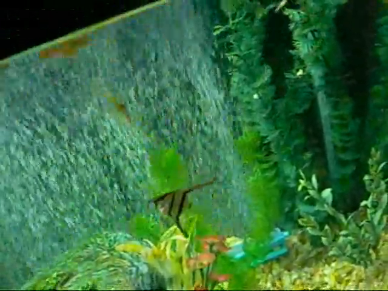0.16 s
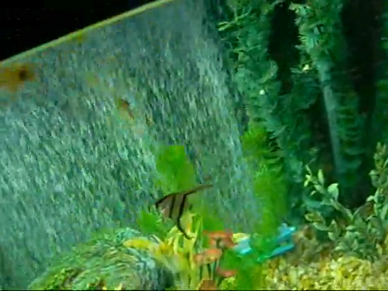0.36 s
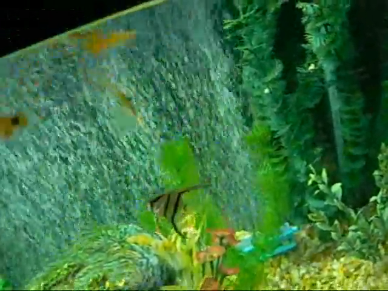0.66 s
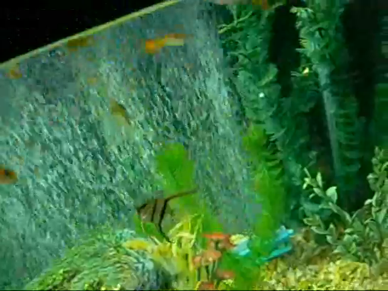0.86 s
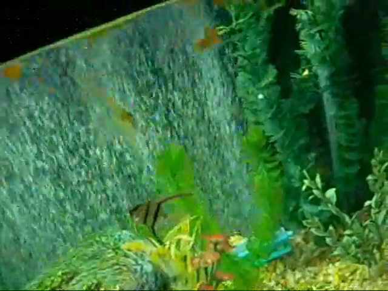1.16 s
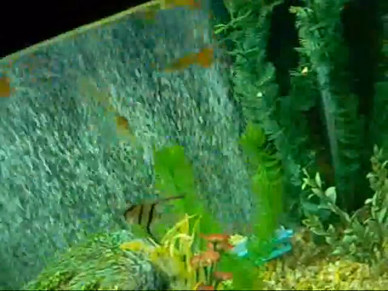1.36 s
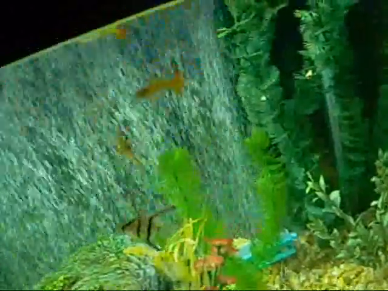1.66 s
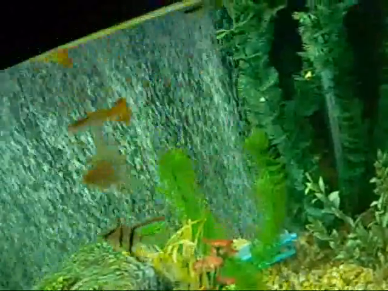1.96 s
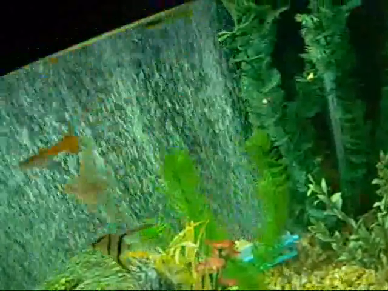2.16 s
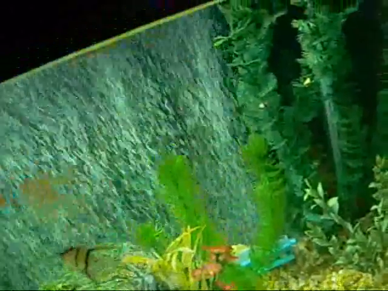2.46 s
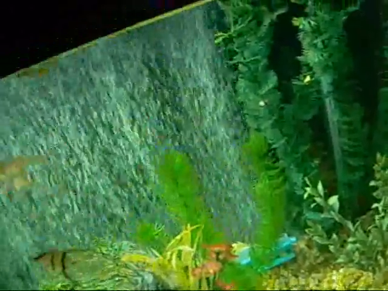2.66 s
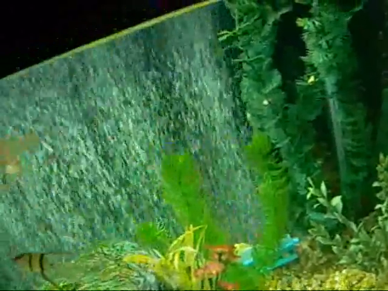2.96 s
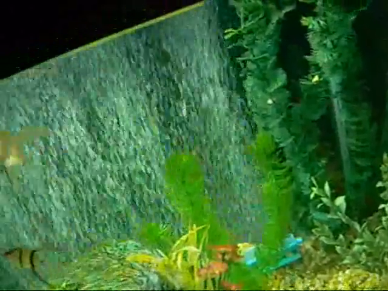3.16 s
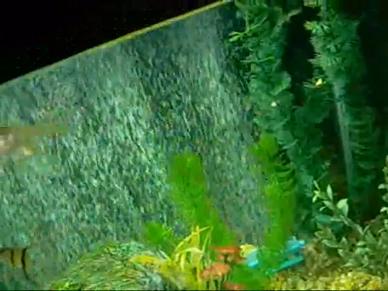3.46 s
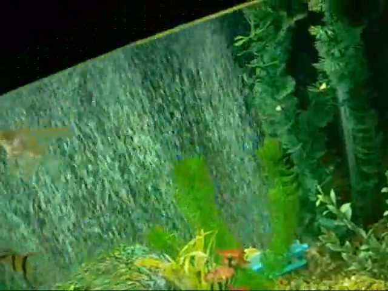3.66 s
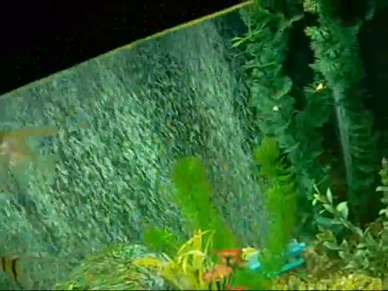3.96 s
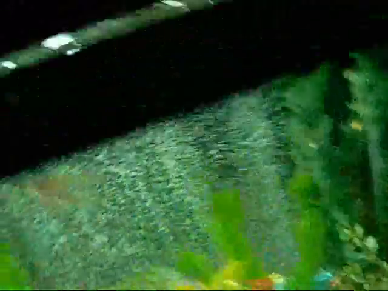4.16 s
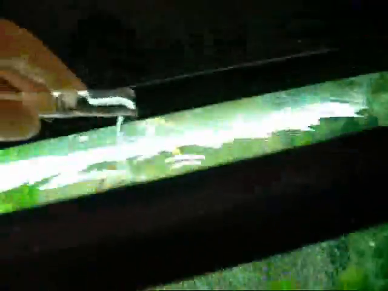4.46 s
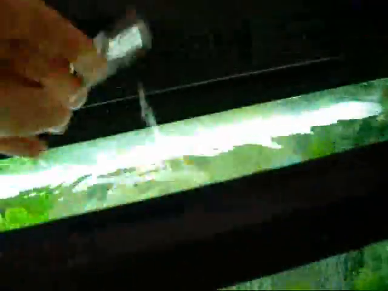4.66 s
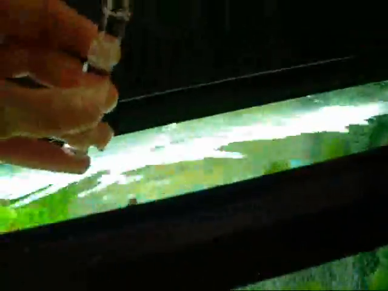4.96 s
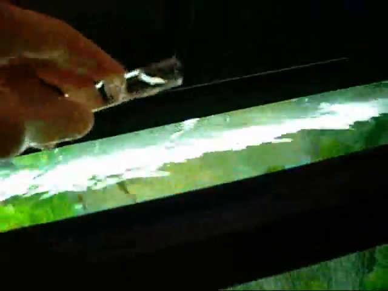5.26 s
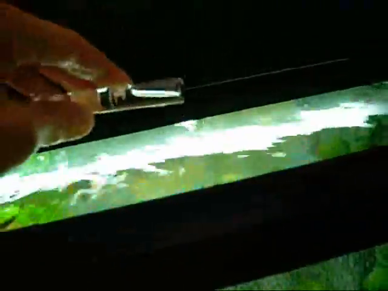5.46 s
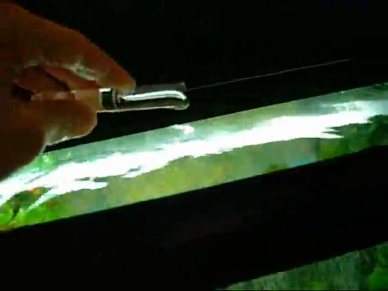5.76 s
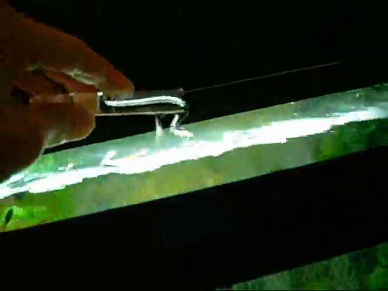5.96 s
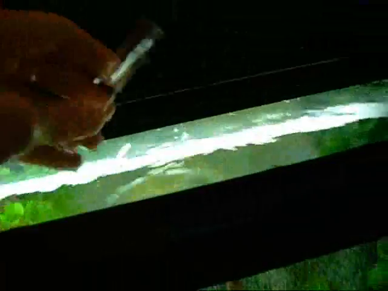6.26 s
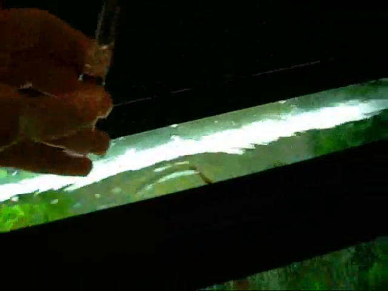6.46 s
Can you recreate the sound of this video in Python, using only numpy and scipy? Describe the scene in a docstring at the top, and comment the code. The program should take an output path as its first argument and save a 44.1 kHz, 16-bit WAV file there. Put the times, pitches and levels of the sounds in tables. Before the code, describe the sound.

A fish tank's air pump hums low under a steady stream of fine bubbles, at first dull and hollow because a finger covers the microphone. Small rubs and grip rumble intrude. Just before four seconds, quick thumps and scrapes free the microphone; the fizz becomes loud, bright and gritty. A sharp glass click follows, then a few bubble plips and a softer cluster of clicks near the end.

```python
"""An aquarium air pump hums while a curtain of fine bubbles fizzes at the surface of the tank.
At first a finger covers the camera's microphone: the leaking fizz is dull, the air pocket under the
finger rings hollow, and the grip rumbles. The finger shifts, then lifts with rubs and thumps; the hiss
opens up, large bubbles burst as dying sines, and a glass tube clicks in damped modes over the water.
Throughout, the camera samples at 8 kHz and holds each value, which mirrors the sound into a gritty treble."""
import sys
import numpy as np
from scipy import signal
from scipy.fft import rfft, irfft
from scipy.io import wavfile
from scipy.ndimage import map_coordinates

SR = 44100
rng = np.random.default_rng(int(sys.argv[2]) if len(sys.argv) > 2 else 0)


def output_pcm(signal):
    """Save a mono or channel-first signal as 16-bit PCM at the path in sys.argv[1].

    Samples are clipped to [-1, 1] before scaling.
    """
    pcm = np.clip(np.atleast_2d(signal).T, -1, 1) * 32767
    wavfile.write(sys.argv[1], SR, np.round(pcm).astype(np.int16))


N = 291942
T = np.arange(N) / SR  # time of each sample, s

STROKE_HZ = 60.125  # pump strokes per second
SAMPLING_HZ = 8000  # rate at which the camera samples
# the finger presses tightly until it shifts and lets a little more sound leak past
SHIFT_S = 0.94
# it then lifts, and the port opens evenly over OPEN_S
LIFT_S, OPEN_S = 3.778, 0.04


def undb(db):
    """Level to amplitude: 20 dB is a factor of ten."""
    return 10 ** (np.asarray(db) / 20)


def unit(x):
    """Normalisation by the standard deviation, to rms 1."""
    return x / np.std(x)


def ramp(start_s, length_s):
    """Linear transition: 0 until start_s, rising evenly to 1 over length_s."""
    return np.clip((T - start_s) / length_s, 0, 1)


def add(out, start_s, sound):
    """Superposition: mix a sound into out from start_s on."""
    start = max(int(start_s * SR), 0)
    part = sound[:max(N - start, 0)]
    out[start:start + len(part)] += part


def colour(white, spectrum):
    """Spectral shaping: give white noise of rms 1 a density (Hz, dB per Hz), drawn over log frequency."""
    hz, db = np.transpose(spectrum)
    bins = np.maximum(np.fft.rfftfreq(N, 1 / SR), 1)
    gain = undb(np.interp(np.log(bins), np.log(hz), db))
    return irfft(rfft(white) * gain, N) * np.sqrt(SR / 2)


def resonate(x, hz, width_hz):
    """Resonance: pass a steep band of the given width, with gain 1 at its centre."""
    edges = [hz - width_hz / 2, hz + width_hz / 2]
    return signal.sosfilt(signal.butter(2, edges, "band", fs=SR, output="sos"), x)


def ring(hz, t60, glide=0):
    """Damped oscillation: a sine dies by 60 dB in t60 seconds as its pitch rises by the share glide."""
    t = T[:int(t60 * SR)]
    phase = 2 * np.pi * hz * t * (1 + glide * t / (2 * t60))
    return np.sin(phase) * np.exp(-np.log(1000) * t / t60)


def pump(seal_db, waver=0.066, bass_hz=500):
    """Harmonic series of the diaphragm, with half orders from the rocking case; covered and open."""
    # harmonics of the hum: stroke_multiple, covered_db (rms), open_db (rms)
    harmonics = [(.5, -53.5, -59), (1, -44.5, -46), (1.5, -56, -57.5), (2, -55, -60.5), (2.5, -70, -67.5),
                 (3, -76, -62), (3.5, -63, -64), (4, -57.5, -52.5), (4.5, -64, -67), (5, -64, -58),
                 (5.5, -72, -66.5), (6, -62, -54.5), (6.5, -66.5, -68), (7, -64.5, -70), (8, -66, -59),
                 (9, -68.5, -58.5), (10, -60.5, -55), (11, -58.5, -55.5), (12, -68, -56.5),
                 (13, -81, -57.5), (14, -64.5, -51.5), (15, -91, -55), (16, -65, -73), (17, -70, -59)]
    covered, opened = np.zeros(N), np.zeros(N)
    knots = np.linspace(0, T[-1], 24)
    seal = undb(seal_db)
    for multiple, covered_db, open_db in harmonics:
        hz = np.round(2 * multiple) / 2 * STROKE_HZ
        # higher orders waver more in strength
        strengths = 1 + waver * np.sqrt(multiple) * rng.standard_normal(len(knots))
        swell = np.interp(T, knots, strengths)
        line = np.sqrt(2) * swell * np.sin(2 * np.pi * (hz * T + rng.random()))
        # the bass passes the finger however tightly it presses
        covered += undb(covered_db) * line * (seal if hz > bass_hz else 1)
        opened += undb(open_db) * line
    return covered, opened


def grip(held_db=-42.5, settled_db=-53, settle_s=0.3, jolt_db=-36, jolt_width_s=0.068, loose_db=-57.5):
    """Amplitude envelope of the hand's rumble: it settles after the shift and jolts at the lift."""
    held = undb(held_db + (settled_db - held_db) * ramp(SHIFT_S, settle_s))
    lifted = ramp(LIFT_S, OPEN_S)
    jolt = undb(jolt_db) * np.exp(-((T - LIFT_S) / jolt_width_s) ** 2)
    return (1 - lifted) * held + lifted * undb(loose_db) + jolt


def hand(rub_low_hz=175):
    """Friction and displacement: grip rumble, short noisy rubs and push-pull swings of pressure."""
    # shape of the rumble's spectrum: frequency_hz, relative_db
    rumble_spectrum = [(8, 11), (35, 8), (55, -4), (100, -13), (200, -17), (600, -27)]
    # the finger rubs on the case: start_s, length_s, level_db (rms before the taper), top_hz
    rubs = [(0.949, 0.00388, -37.5, 890), (.957, 0.011, -44, 3200), (1.303, .038, -40, 840),
            (1.307, .05, -45.5, 316), (3.753, .025, -41.5, 540), (3.783, .02, -37.5, 1410)]
    # the finger pumps air into the port as it lifts: start_s, length_s, peak_db
    thumps = [(3.703, 0.018, -28), (3.722, 0.013, -31), (3.757, 0.061, -29.5), (3.785, 0.0076, -28.5)]
    out = unit(colour(rng.standard_normal(N), rumble_spectrum)) * grip()
    for start_s, length_s, level_db, top_hz in rubs:
        band = signal.butter(5, [rub_low_hz, top_hz], "band", fs=SR, output="sos")
        friction = unit(signal.sosfilt(band, rng.standard_normal(N)))
        n = int(length_s * SR)
        add(out, start_s, undb(level_db) * friction[-n:] * signal.windows.tukey(n))
    for start_s, length_s, peak_db in thumps:
        n = int(length_s * SR)
        swing = -np.sin(2 * np.pi * np.arange(n) / n)  # one cycle
        add(out, start_s, undb(peak_db) * swing * signal.windows.tukey(n, 0.3))
    return out


def tube(echo_s=0.0031, echo_db=-6, tail_db=-30, tail_t60=0.48):
    """Modal excitation and reflection: contacts ring the glass; the hood echoes, then scatters, each click."""
    # modes of the tube, damped by the fingers: pitch_hz, relative_db, t60_s
    glass_modes = [(1650, -8, 0.0031), (2090, 1.5, 0.021), (3000, 2.5, 0.0099), (3330, -4, 0.0067),
                   (3880, -10, 0.0031)]
    # contacts of the tube: start_s, peak_db, lowest_excited_hz
    clicks = [(4.3709, -6, 2740), (5.7623, -11, 1380), (5.772, -22, 1980), (5.7745, -24, 1500),
              (5.797, -24, 3030), (5.8225, -34, 2000)]
    modes, out = np.zeros(SR // 5), np.zeros(N)
    t = T[:len(modes)]
    for hz, db, t60 in glass_modes:
        modes += undb(db - 60 * t / t60) * np.sin(2 * np.pi * hz * t)
    for start_s, peak_db, low_hz in clicks:
        # a harder contact rings only the upper modes
        click = signal.sosfilt(signal.butter(8, low_hz, "high", fs=SR, output="sos"), modes)
        click = click * undb(peak_db) / np.abs(click).max()
        band = signal.butter(3, [low_hz, SAMPLING_HZ / 2], "band", fs=SR, output="sos")
        scattered = unit(signal.sosfilt(band, rng.standard_normal(len(t))))
        tail = scattered * np.exp(-np.log(1000) * t / tail_t60)
        add(out, start_s, click)
        add(out, start_s + echo_s, undb(echo_db) * click + undb(peak_db + tail_db) * tail)
    return out


def pops(glide=0.045):
    """Bubble resonance: a few large bubbles burst out of the fizz as damped tones of rising pitch."""
    # large bubbles: start_s, level_db (at the onset), starting_pitch_hz, t60_s
    bursts = [(4.18, -25.5, 1820, 0.042), (4.956, -31, 3100, .025), (5.042, -25, 1340, 0.036),
              (5.1025, -39, 2280, 0.018), (5.952, -24, 3720, 0.017), (6.5507, -30, 2650, .02)]
    out = np.zeros(N)
    for start_s, level_db, hz, t60 in bursts:
        add(out, start_s, undb(level_db) * ring(hz, t60, glide))
    return out


def bubbling(steady_db=-0.1):
    """Amplitude modulation of the bubbling: steady, with a rounded swell for each brief surge."""
    # surges: centre_s, length_s, rise_db
    surges = [(1.88, 0.087, 1.7), (4.15, 0.27, 0.7)]
    swell_db = sum(db * np.exp(-(2 * (T - s) / length_s) ** 2) for s, length_s, db in surges)
    return undb(steady_db + swell_db)


def pocket(flow, peeled, level_db=0.77, rise=2.55, rise_s=0.05, swell_db=8, hold_s=0.12, fade_db_per_s=130):
    """Cavity resonance: the air under the finger rings with the diffuse hiss of the whole tank."""
    # resonances of the cavity: centre_hz, width_hz, relative_db (per Hz)
    cavity_modes = [(1492, 516, -74), (1450, 59, -77.5)]
    hiss = rng.standard_normal(N) * np.sqrt(SR / 2)
    hollow = sum(undb(db) * resonate(hiss, hz, width_hz) for hz, width_hz, db in cavity_modes)
    # a wider gap makes the pocket swing faster: reading faster raises and broadens its ring together
    speed = rise ** ramp(LIFT_S, rise_s)
    ringing = np.interp(np.cumsum(speed) % N, np.arange(N), hollow)
    # the ring swells as the skin peels off, holds briefly after the lift, then dies
    fade_db = fade_db_per_s * np.maximum(T - LIFT_S - hold_s, 0)
    return flow * undb(level_db + swell_db * peeled - fade_db) * ringing


def bubbles(count=48, cycles=16, rate=260, scatter_db=2.5, spray_db=-3, throb=0.065):
    """Random superposition: countless small bubbles ring over a fine spray, swelled by each pump stroke."""
    ringing = np.zeros(N)
    for hz in np.geomspace(600, 4400, count):
        # rate bubbles a second in each size class; a few are much louder than the rest
        bursts = np.zeros(N)
        when, size = rng.random((int(rate * N / SR), 2)).T
        loudness = undb(-scatter_db * np.log(1 - 0.99 * size))
        bursts[(when * N).astype(int)] = loudness * rng.choice([-1, 1], len(when))
        # each bubble dies by 60 dB in the given number of cycles
        b, a = signal.iirpeak(hz, np.pi * cycles / np.log(1000), fs=SR)
        ringing += unit(signal.lfilter(b, a, bursts)) * np.sqrt(hz)
    # the bubbles fill the band above 600 Hz; below it the water only churns
    ringing = unit(ringing) * np.sqrt(4200 / (SR / 2))
    churn = signal.sosfilt(signal.butter(4, 600, fs=SR, output="sos"), rng.standard_normal(N))
    spray = undb(spray_db) * rng.standard_normal(N)
    mix = (ringing + churn + spray) / np.hypot(1, undb(spray_db))
    return mix * (1 + throb * np.sin(2 * np.pi * STROKE_HZ * T))


def scene(leak_db=0.56, tight_db=-3, shift_length_s=0.046, peel_s=0.036, peel_db=6):
    """Transmission past an obstacle: pump and bubbles leak past the finger, then enter the open port."""
    # fizz at the water surface, shaped by the air under the hood: frequency_hz, density_db (per Hz)
    open_spectrum = [(30, -87), (130, -89), (250, -78.5), (350, -79), (450, -78), (700, -77), (860, -67.5),
                     (1060, -69), (1170, -72.5), (1360, -66.5), (1700, -72), (2300, -72), (3250, -69),
                     (4000, -70)]
    # the same fizz as it leaks past the finger: frequency_hz, relative_db (per Hz)
    leak_spectrum = [(30, -68.5), (230, -83), (450, -83.5), (650, -82), (850, -80.5), (1030, -89),
                     (1300, -81), (2300, -87), (3000, -86), (4000, -90)]
    opening = ramp(LIFT_S, OPEN_S)
    # just before the port opens, the leak swells as the skin peels off
    peeled = ramp(LIFT_S - peel_s, peel_s) ** 2
    seal_db = tight_db * (1 - ramp(SHIFT_S, shift_length_s)) + peel_db * peeled
    flow = bubbling()
    fizz = flow * bubbles()
    hum_covered, hum_open = pump(seal_db)
    covered = colour(fizz, leak_spectrum) * undb(leak_db + seal_db) + hum_covered
    opened = colour(fizz, open_spectrum) + hum_open + tube() + pops()
    through_port = (1 - opening) * covered + opening * opened
    return (through_port + pocket(flow, peeled) + hand())[None]


def record(dry, top_hz=15400):
    """Sample and hold: the camera keeps the band under 4 kHz, and the held steps mirror it upwards."""
    narrow = signal.sosfilt(signal.butter(12, SAMPLING_HZ / 2, fs=SR, output="sos"), dry[0])
    held_positions = np.floor(T * SAMPLING_HZ) * SR / SAMPLING_HZ
    steps = map_coordinates(narrow, [held_positions], order=3)
    return signal.sosfilt(signal.ellip(12, 0.1, 80, top_hz, fs=SR, output="sos"), steps)[None]


dry = scene()
out = record(dry)
output_pcm(out)
```